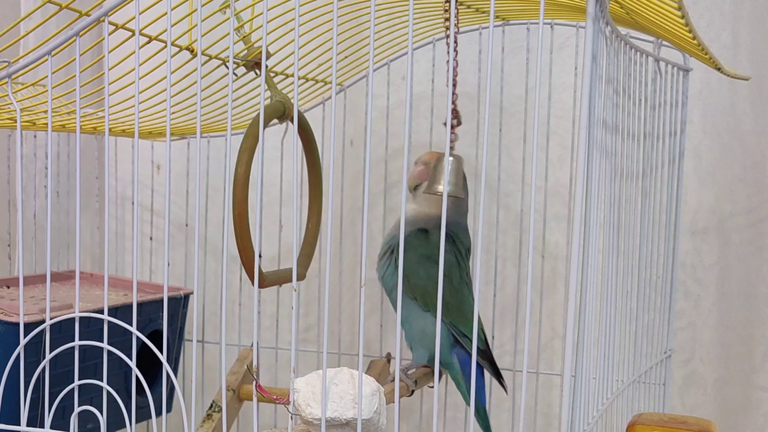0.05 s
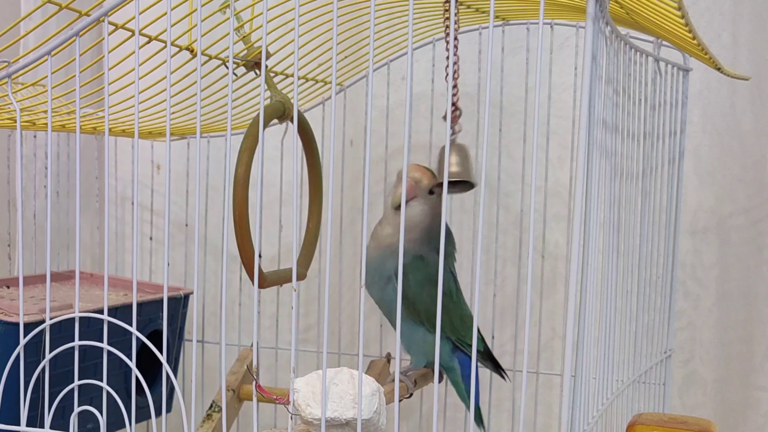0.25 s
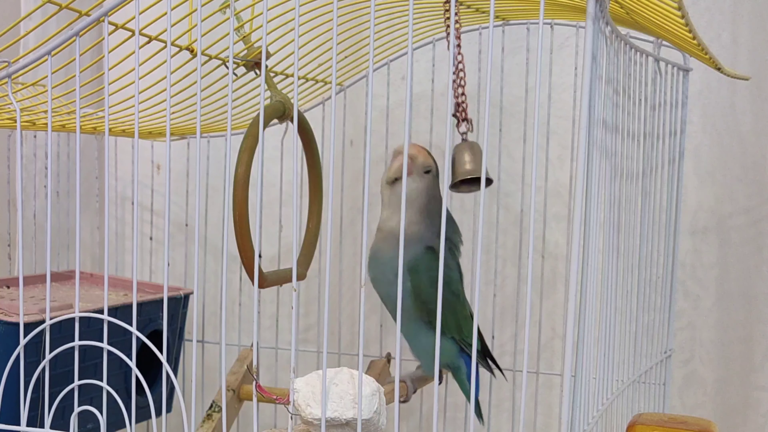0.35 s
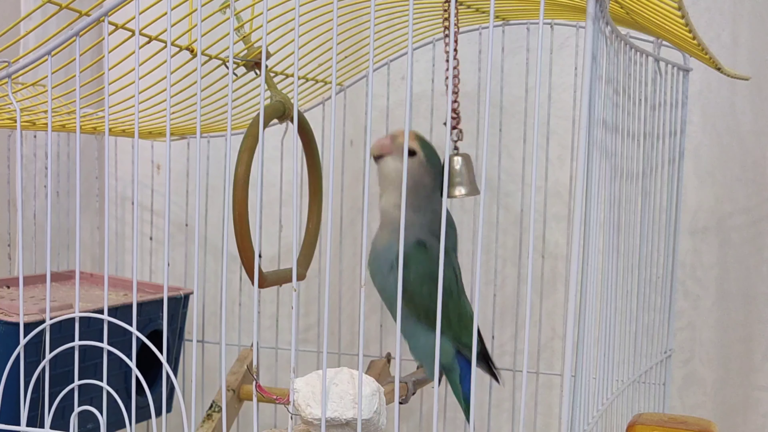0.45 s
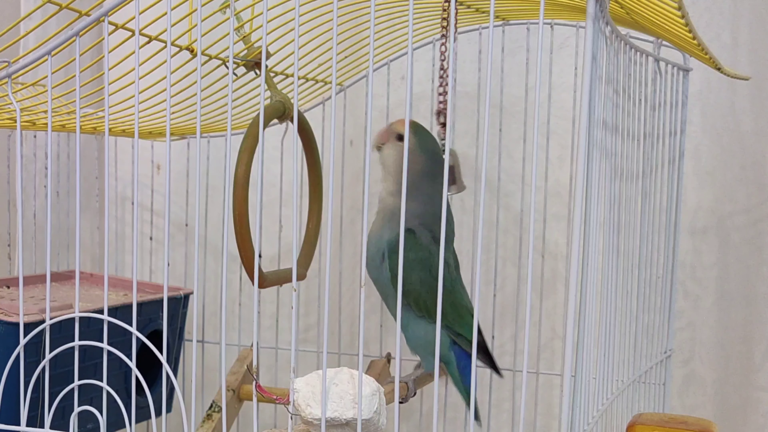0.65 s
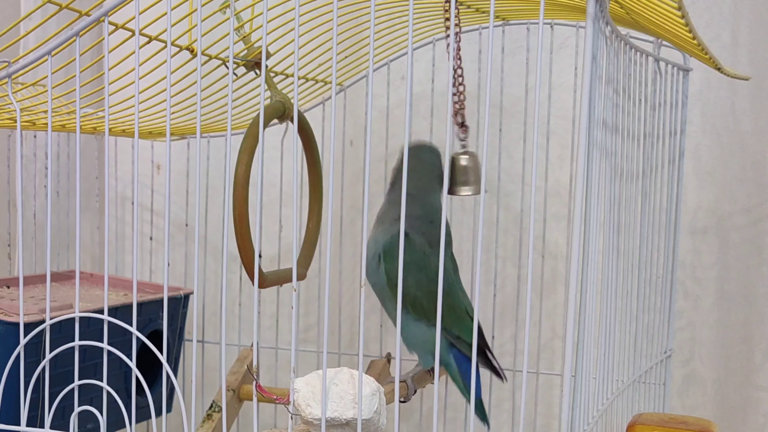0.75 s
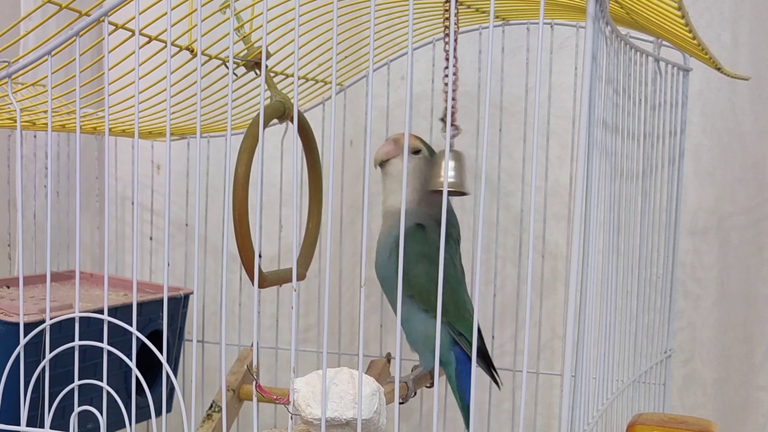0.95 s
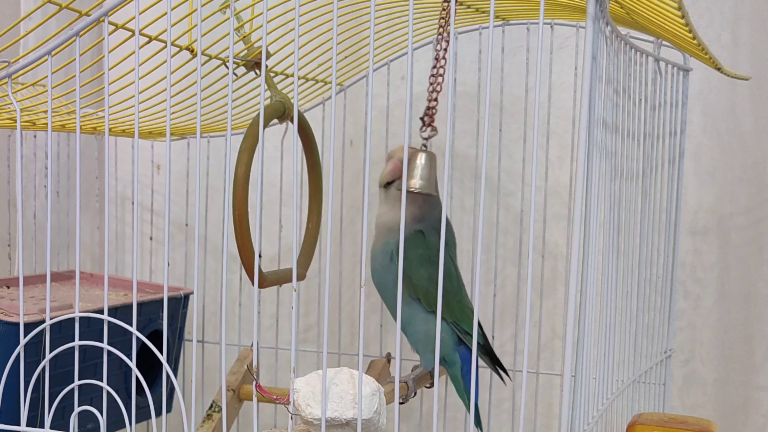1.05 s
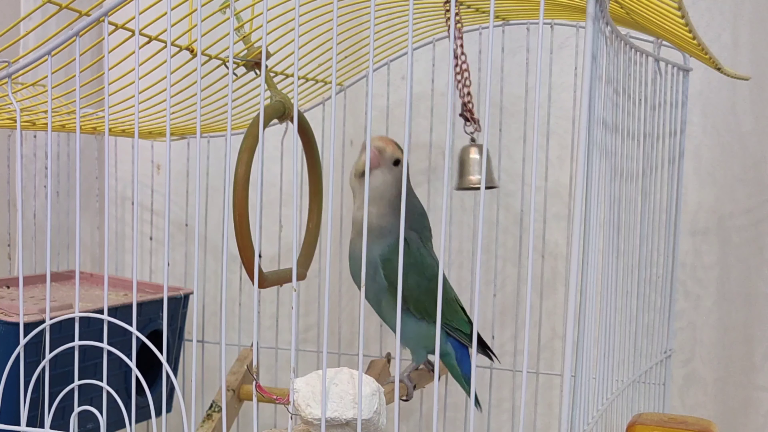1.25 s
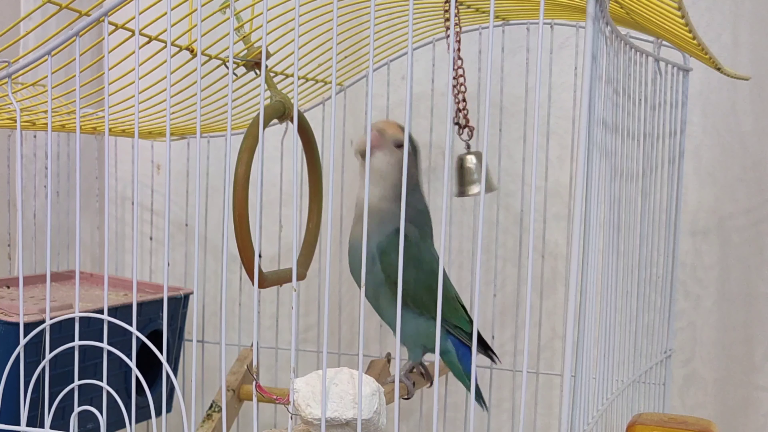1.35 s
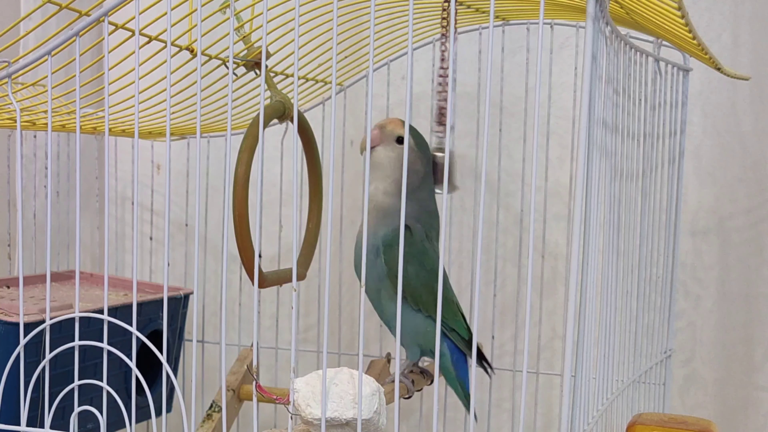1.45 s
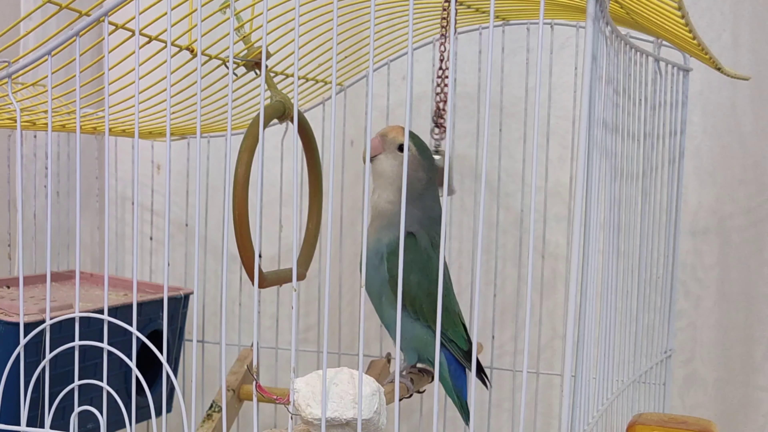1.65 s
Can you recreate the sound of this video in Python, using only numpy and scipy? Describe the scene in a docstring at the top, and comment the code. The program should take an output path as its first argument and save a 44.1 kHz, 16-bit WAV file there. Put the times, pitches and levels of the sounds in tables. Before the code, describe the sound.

A small parrot gives shrill chirps, then harsh squawks, close by in a quiet room.

```python
"""Three shrill chirps, then three harsh squawks: a small parrot in a wire cage, close to the microphone.
Its voice is one gliding tone with overtones that turns rough at the leaps and breaks into a fast rattle
in the last call. A toy bell that the bird has nudged tinkles faintly. The wall just behind the cage
and the quiet room answer, over faint room tone and a few soft rustles."""
import sys
import numpy as np
from scipy import signal
from scipy.fft import rfft, irfft
from scipy.io import wavfile

SR = 44100
rng = np.random.default_rng(int(sys.argv[2]) if len(sys.argv) > 2 else 0)


def persist_wave(psi):
    """Save psi, clipped to +-1, as 16-bit WAV."""
    counts = np.round(np.clip(psi, -1, 1) * 32767).astype(np.int16)
    wavfile.write(sys.argv[1], SR, np.atleast_2d(counts).T)


N = 74970
ATTACK_S, CUTOFF_HZ = 0.0018, 15700   # onset of calls and bell taps; upper limit of the sound

# contours of the voice: t/s, pitch/Hz, level/dB, overtones/dB, roughness/0-1
LEAD_IN = [(.162, 1606, -49.5, -2, 0.1), (.176, 1497, -44, -2, 0.13), (.192, 1611, -42.5, 0.5, 0.2),
           (.204, 1601, -47.5, 4, 0.02), (.213, 1682, -41.5, 7, .1), (.222, 1784, -48.5, 1.5, 0)]
CRACK = [(.253, 3933, -36, 0.047, 0.53), (.259, 4033, -14.5, 0.0053, 0.027), (.263, 4046, -16, 0, 0.37),
         (.269, 4220, -16, 0.0035, 0.074)]
SHRIEK = [(.266, 2147, -28, -1, 0.048), (.277, 2012, -28.5, -1.5, 0.026), (.285, 1915, -33, 1.5, 0.025),
          (.292, 1872, -31.5, -7, 0.034), (.311, 1852, -34, 0, .06), (.319, 1810, -47, -15, 0.081)]
WHISTLE = [(.394, 1822, -45, 3.5, 0.9), (.408, 2060, -32, 6, 0.22), (.418, 2790, -33, 8, 0.99),
           (.425, 3253, -21.5, -6.5, 0.4), (.432, 3072, -17.5, -2, 0.058), (.441, 3095, -9, -14, 0.0066),
           (.460, 3041, -19.5, -5, 0.05), (.472, 2884, -20.5, 2.5, 0.032), (.481, 2660, -12.5, -8.5, 0.029),
           (.490, 2661, -14, -7.5, .04), (.503, 2547, -17, -4.5, 0.056), (.512, 2482, -31, -8, 0.089),
           (.524, 2217, -31.5, -1, 0.13)]
RISING_SQUAWK = [(.942, 1475, -45.5, -3, .1), (.955, 1561, -48.5, 11.5, 0.15), (.969, 1612, -44, 4, 0.19),
                 (.980, 1754, -33.5, 2, 0.18), (.984, 2388, -41, -4.5, 0.88),
                 (.993, 2860, -29.5, -14.5, 0.48), (.998, 3162, -38, 1.5, 0.43),
                 (1.003, 3103, -30, -23, 0.48)]
FALLING_SQUAWK = [(1.041, 3600, -25.5, -21.5, 1), (1.051, 2732, -32, -10, .75),
                  (1.063, 2368, -24, -12.5, .6), (1.072, 2020, -35.5, 0.5, 0.64),
                  (1.081, 1671, -32, -2, 0.35), (1.097, 1495, -37, 6, 0.17), (1.106, 1468, -42.5, 13, 0.25)]
RATTLING_SQUAWK = [(1.191, 2006, -30, -0.5, .3), (1.200, 2211, -27, -6.5, 0.42),
                   (1.211, 2679, -22, -18, 0.46), (1.224, 2794, -32, -1, 0.52),
                   (1.233, 3121, -21, -24.5, .55), (1.251, 3150, -22.5, -14, .55),
                   (1.269, 2719, -23.5, -15, .5), (1.277, 2451, -29, -23, 0.65),
                   (1.284, 1699, -29.5, -8.5, 0.64), (1.298, 1605, -35.5, 0, .6),
                   (1.307, 1978, -29.5, -12, 0.54), (1.316, 1242, -32.5, -5, 0.32),
                   (1.326, 1117, -41, -1, 0.09)]
# throat and beak, open for the chirps, narrowed for the squawks: f/Hz, gain/dB
CHIRP_THROAT = [(60, -20.5), (750, 4.5), (1000, -3.5), (1500, -2.5), (5900, 0.5), (6400, 2.5), (7100, -6),
                (8500, 1.5), (10300, -3), (12800, 6.5), (15000, -11)]
SQUAWK_THROAT = [(60, -20), (750, -2.5), (1000, -10.5), (1600, -2), (2500, -2.5), (2780, 3), (3020, -3.5),
                 (3320, 3), (3650, -5), (4100, -0.5), (5800, -3), (6400, 3.5), (7800, -3.5), (10000, -9),
                 (12000, -8.5), (15500, -8)]


def from_db(db):
    """Decibels to gain."""
    return 10 ** (np.asarray(db) / 20)


def at_hz(points, hz, column=1):
    """Read a table on a log-frequency axis."""
    points = np.array(points)
    return np.interp(np.log(hz + 1), np.log(points[:, 0]), points[:, column])


def coloured(x, spectrum):
    """Filter by a table of f/Hz, gain/dB."""
    return irfft(rfft(x) * from_db(at_hz(spectrum, np.fft.rfftfreq(N, 1 / SR))), N)


def coloured_noise(spectrum):
    """Noise with the given spectrum, rms 1."""
    x = coloured(rng.standard_normal(N), spectrum)
    return x / x.std()


def wide_noise(spectrum, side=.74):
    """Stereo noise, partly alike on left and right."""
    return coloured_noise(spectrum) + side * coloured_noise(spectrum) * np.array([[1], [-1]])


def wobble(hz, kind="low"):
    """Random motion below one speed or between two, rms 1."""
    x = signal.sosfilt(signal.butter(2, hz, kind, fs=SR, output="sos"), rng.standard_normal(N))
    return x / x.std()


def delayed(x, s):
    """The sound s seconds later."""
    return irfft(rfft(x) * np.exp(-2j * np.pi * np.fft.rfftfreq(N, 1 / SR) * s), N)


def room_tone():
    """Faint steady noise of the home, all around the microphone."""
    # spectrum of the room tone: f/Hz, relative level/dB
    spectrum = [(25, -26), (50, -26), (90, -10.5), (185, -5), (500, -9.5), (750, -14.5), (1500, -14.5),
                (2400, -17), (5500, -27), (8500, -40), (15000, -49)]
    return from_db(-67) * wide_noise(spectrum)


def bell():
    """Light taps of the clapper ring two close, high modes of the toy bell."""
    # clapper taps: t/s, lower mode level/dB, upper mode level/dB
    taps = [(.001, -62.5, -74), (0.616, -82, -67.5), (.700, -62, -96), (.784, -63.5, -60.5),
            (.886, -64, -78), (1.175, -59.5, -77), (1.645, -63, -66.5)]
    # modes of the bell: f/Hz, t60/s
    modes = [(6530, .36), (6831, .32)]
    out = np.zeros((2, N))
    for start, *levels_db in taps:
        age = np.maximum(np.arange(N) / SR - start, 0)
        for (hz, t60), db in zip(modes, levels_db):
            phases = rng.uniform(0, np.pi / 2, (2, 1))
            envelope = np.minimum(age / ATTACK_S, 1) * np.exp(-np.log(1000) * age / t60)
            out += from_db(db) * envelope * np.sin(2 * np.pi * hz * age + phases)
    return out


def flutter(depth, span, centre_hz=414):
    """Fast irregular shaking of the voice, as a factor around 1."""
    return 1 + depth * wobble([centre_hz / 2, centre_hz * 2], "band")[span]


def call(contour, harmonics_db):
    """A gliding tone with overtones; roughness shakes its pitch and level and adds rasp."""
    # rasp of air in the throat: f/Hz, relative level/dB
    rasp_spectrum = [(100, -35.5), (800, -11), (1700, -1), (3200, -10), (5300, -8.5), (6400, -14.5),
                     (8000, -29.5), (10500, -34), (15500, -40.5)]
    pitch_flutter, level_flutter = 0.13, 0.28   # rms shares at full roughness
    quaver_hz, quaver_depth = 150, 0.0076   # slight unsteadiness of every note
    rasp_db, rasp_floor = -16, 0.0044   # a trace of rasp stays in clean notes
    release_s = 0.0013
    times, *columns = np.transpose(contour)
    span = np.arange(int(times[0] * SR), int(times[-1] * SR))
    t = span / SR
    pitch, level_db, overtones_db, rough = (np.interp(t, times, c) for c in columns)
    rattling, beats, bend = rattle(t)
    shake = flutter(pitch_flutter * rough, span) + quaver_depth * wobble(quaver_hz)[span]
    phase = 2 * np.pi * np.cumsum(pitch * bend * shake) / SR
    tone = sum(from_db(db + overtones_db * (k > 1)) * np.sin(k * phase) * (k * pitch < CUTOFF_HZ)
               for k, db in enumerate(harmonics_db, 1))
    tone += hoarseness(t, phase)
    tone += rattling * undertone(bend * flutter(pitch_flutter * rough, span))
    tone = np.sqrt(2) * tone * flutter(level_flutter * rough, span)
    overtone_power = from_db(2 * overtones_db) * from_db(2 * np.array(harmonics_db[1:])).sum()
    rasp_gain = from_db(rasp_db) * np.sqrt(1 + overtone_power) * (rasp_floor + rough)
    rasp = rasp_gain * coloured_noise(rasp_spectrum)[span]
    ramp = np.clip(np.minimum((t - times[0]) / ATTACK_S, (times[-1] - t) / release_s), 0, 1)
    out = np.zeros(N)
    out[span] = (tone + rasp) * from_db(level_db) * beats * np.sin(np.pi / 2 * ramp) ** 2
    return out


def hoarseness(t, phase):
    """Alternate cycles of the voice weaken, adding tones halfway between the harmonics."""
    # hoarse moments: t/s, half length/s, strength
    moments = [(.187, .017, 0.99)]
    # tones at 1/2, 3/2, .. times the pitch: level/dB
    half_tones = [-15, -18.5, -3, 1.5, -10]
    strength = sum(depth * np.exp(-((t - centre) / length) ** 2) for centre, length, depth in moments)
    return strength * sum(from_db(db) * np.sin((k + .5) * phase) for k, db in enumerate(half_tones))


def rustles():
    """Soft low rustles swell and fade under the chirps and just after."""
    # swells: t/s, half length/s, level/dB
    swells = [(.28, .04, -64.5), (.505, 0.038, -62.5), (0.596, .06, -64)]
    # spectrum of a rustle: f/Hz, relative level/dB
    spectrum = [(30, -25), (175, -3), (240, -8), (1000, -11.5), (3000, -40)]
    t = np.arange(N) / SR
    envelope = sum(from_db(db) * np.exp(-((t - centre) / length) ** 2) for centre, length, db in swells)
    return envelope * wide_noise(spectrum)


def sizzle(half_width_hz=480):
    """Narrow bands of hiss that swell, glide and fade high above the calls."""
    # bands of hiss: start t/s, end t/s, start f/Hz, end f/Hz, level/dB
    bands = [(.455, 0.511, 13250, 11600, -68.5), (.972, 1.003, 13500, 13600, -81.5),
             (1.04, 1.104, 13500, 13200, -69.5), (1.255, 1.323, 13150, 11700, -68.5)]
    t, out = np.arange(N) / SR, 0
    for start, end, start_hz, end_hz, db in bands:
        along = np.clip((t - start) / (end - start), 0, 1)
        phase = 2 * np.pi * np.cumsum(start_hz + (end_hz - start_hz) * along) / SR
        hiss = wobble(half_width_hz) * np.sin(phase) + wobble(half_width_hz) * np.cos(phase)
        out = out + from_db(db) * 2 * np.sqrt(along * (1 - along)) * hiss
    return out


def rattle(t):
    """Fast beats in the last squawk: each slides upwards, and the voice nearly closes between them."""
    start_s, end_s, fade_s = 1.192, 1.284, 0.0058
    beat_at_s, beats_per_s = 1.2362, 155
    depth = np.clip(np.minimum(t - start_s, end_s - t) / fade_s, 0, 1)
    turn = 2 * np.pi * beats_per_s * (t - beat_at_s)
    gain = 1 - .92 * depth * np.sin(turn / 2) ** 2
    bend = 1 + .09 * depth * np.sin(turn)
    return depth, gain, bend


def undertone(bend, centre_hz=2134):
    """A second, lower tone in the rattle, with a weak octave."""
    phase = 2 * np.pi * np.cumsum(centre_hz * bend) / SR
    return from_db(-11.5) * (np.sin(phase) + from_db(-16.5) * np.sin(2 * phase))


def parrot(left_lag_s=.000015):
    """The bird close by, a little to the right, a wall behind it: its voice in mono and in stereo."""
    # the calls, between which the bird turns its head:
    # contour, throat, pan right/dB, wall echo delay/s, wall echo gain, levels of harmonics 1, 2, ../dB
    phrase = [ (LEAD_IN, CHIRP_THROAT, .7, 0.0014, .2, [2.5, 8.5, -4.5, 2.5, -21, -19.5, -27, -28]),
              (CRACK, CHIRP_THROAT, 0.93, 0.0063, 0.17, [0, -26, -42.5]),
              (SHRIEK, CHIRP_THROAT, 0.78, .00203, 0.17, [0.5, 11.5, 1.5, -12.5, -23.5, -29.5]),
              (WHISTLE, CHIRP_THROAT, 0.83, 0.0021, 0.34, [-0.5, -23, -49.5, -40, -46.5]),
              (RISING_SQUAWK, SQUAWK_THROAT, 2.6, .00181, 0.05, [3.5, -4.5, -23, -27, -37, -46]),
              (FALLING_SQUAWK, SQUAWK_THROAT, 1.6, 0.0013, 0.22, [0.5, -4.5, -19, -34]),
              (RATTLING_SQUAWK, SQUAWK_THROAT, 1.2, 0.0016, 0.12, [0, -8, -20.5, -33, -39, -56])]
    voice = direct = sizzle()
    for contour, throat, pan_db, echo_s, echo_gain, harmonics_db in phrase:
        note = coloured(call(contour, harmonics_db), throat)
        note = note + echo_gain * delayed(note, echo_s)
        voice = voice + note
        left = from_db(-pan_db) * delayed(note, left_lag_s)
        direct = direct + np.array([left, from_db(pan_db) * note])
    return voice, direct


def early_reflections(voice):
    """The cage floor and the furniture throw the voice back to the microphone."""
    # echo paths: left delay/s, right delay/s, gain
    paths = [(.0031, 0.0041, 0.18), (.0074, .0066, 0.17), (0.0096, 0.011, .1)]
    return sum(gain * np.array([delayed(voice, left), delayed(voice, right)])
               for left, right, gain in paths)


def reverberation(voice, gap_s=0.0032, build_s=0.002):
    """The room's diffuse answer, dying away band by band."""
    # reverberant tail: f/Hz, level/dB, t60/s
    tail = [(301.3, -7.5, .5), (1497, -3.5, 0.19), (2640, -4, 0.29), (4000, -8.5, 0.32), (6150, -6.5, 0.31),
            (13000, -9.5, 0.18)]
    t, hz = np.arange(SR) / SR, np.fft.rfftfreq(SR, 1 / SR)
    white, response = rfft(rng.standard_normal((2, SR))), 0
    onset = np.clip((t - gap_s) / build_s, 0, 1)
    edges_hz = np.geomspace(200, 16000, 14)
    for low, high in zip(edges_hz, edges_hz[1:]):
        centre = np.sqrt(low * high)
        fade = onset * np.exp(-np.log(1000) * t / at_hz(tail, centre, column=2))
        band = irfft(white * (hz >= low) * (hz < high), SR)
        response = response + from_db(at_hz(tail, centre)) * fade / np.linalg.norm(fade) * band
    return signal.fftconvolve(voice[None], response, axes=1)[:, :N]


def scene():
    """A quiet room, with a stereo microphone close to the cage."""
    voice, direct = parrot()
    return direct + early_reflections(voice) + reverberation(voice) + bell() + room_tone() + rustles()


def record(dry):
    """The top is cut steeply."""
    return signal.sosfilt(signal.ellip(10, .1, 80, CUTOFF_HZ, fs=SR, output="sos"), dry)


dry = scene()
out = record(dry)
persist_wave(out)
```